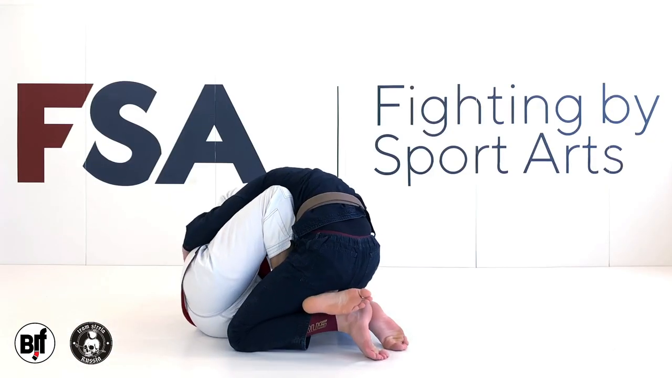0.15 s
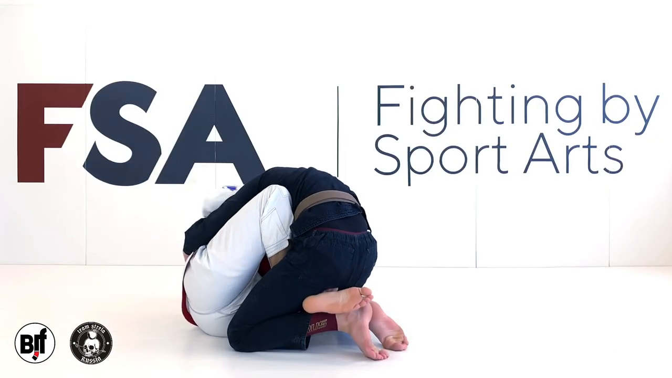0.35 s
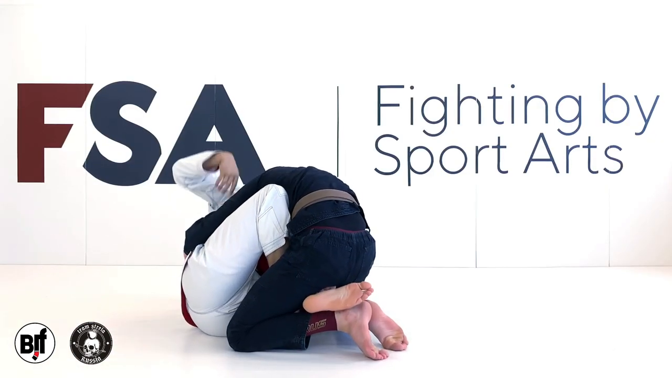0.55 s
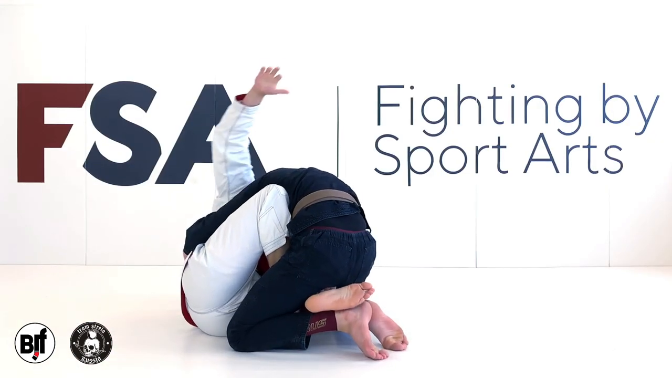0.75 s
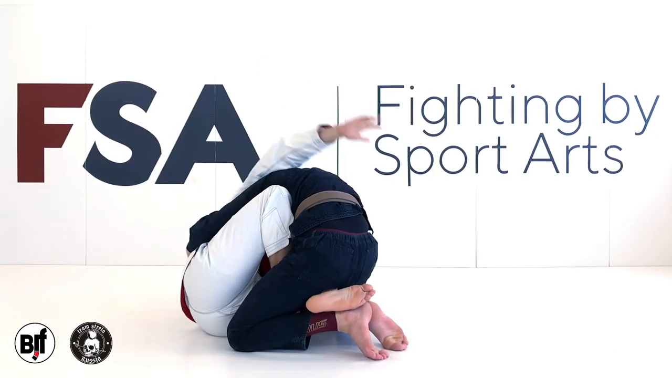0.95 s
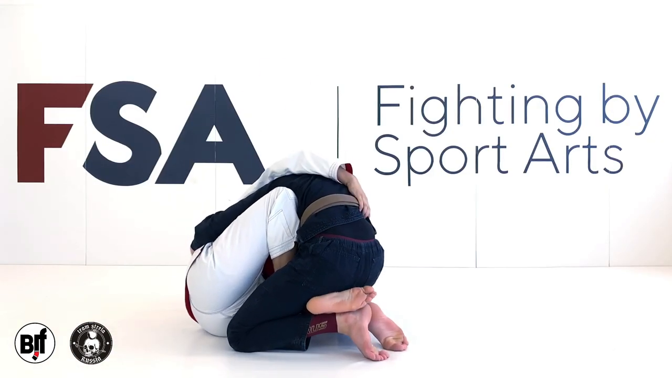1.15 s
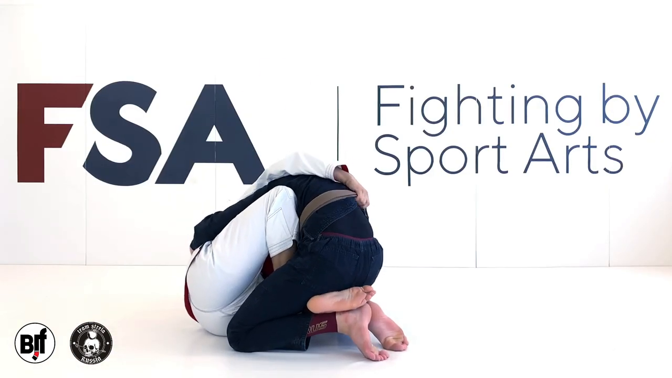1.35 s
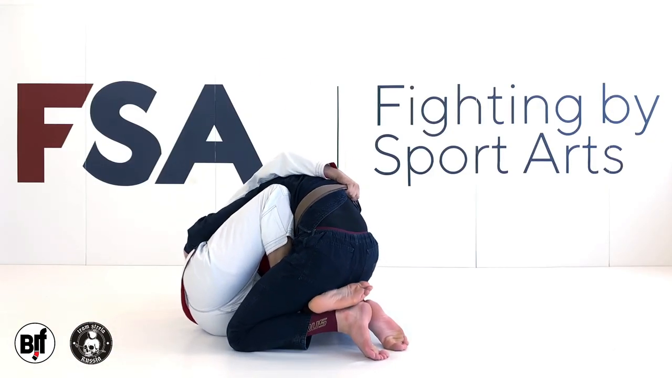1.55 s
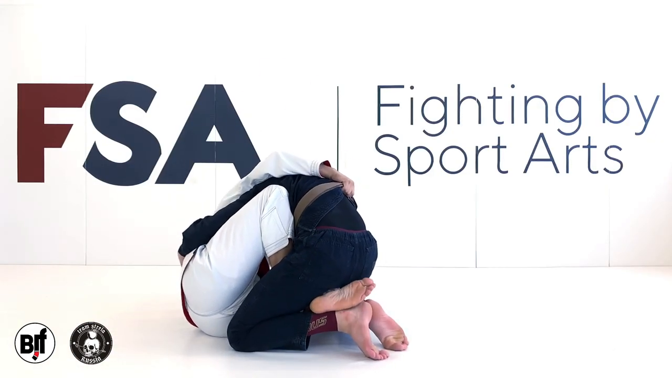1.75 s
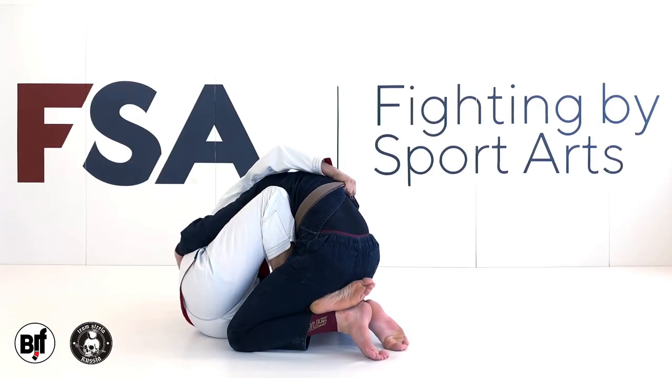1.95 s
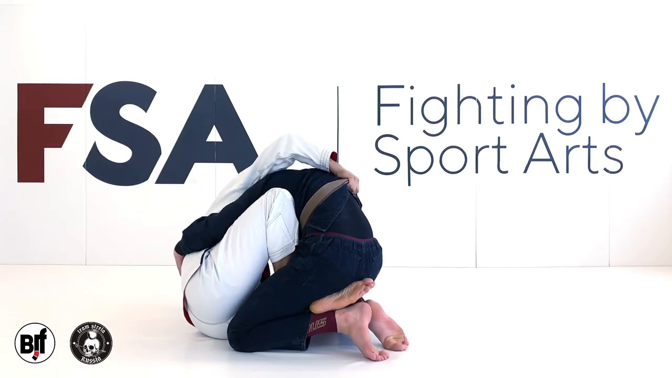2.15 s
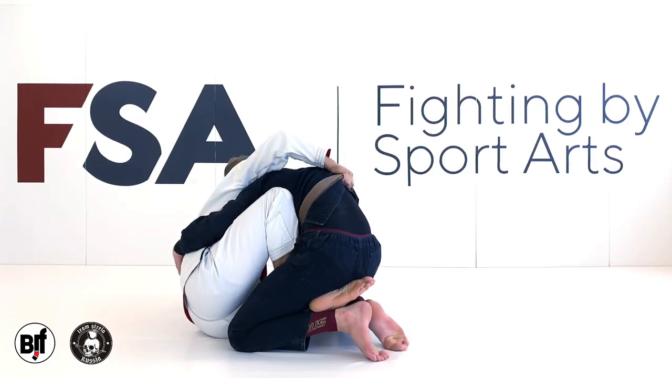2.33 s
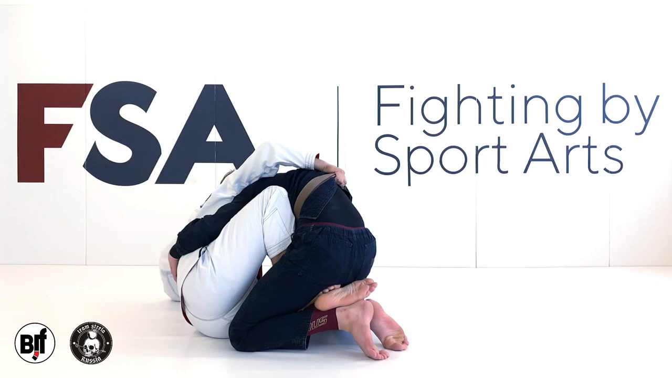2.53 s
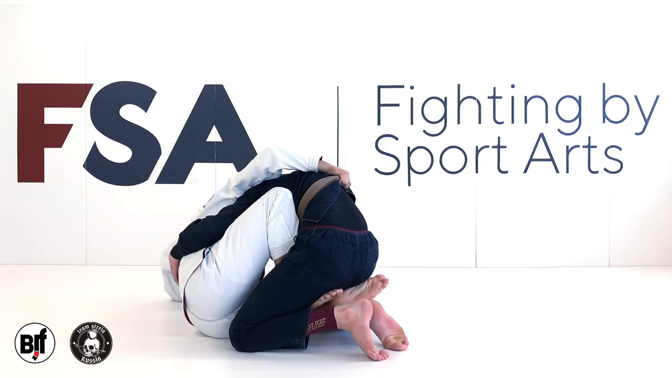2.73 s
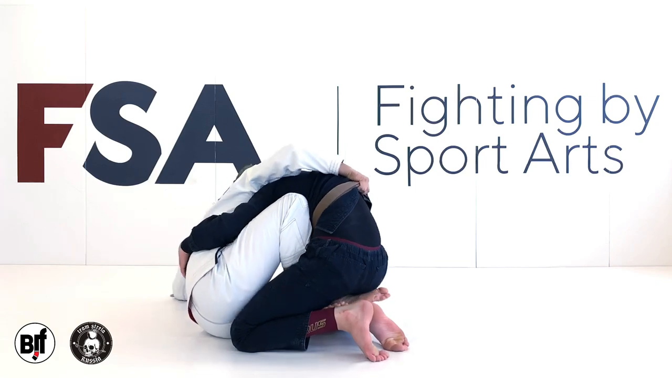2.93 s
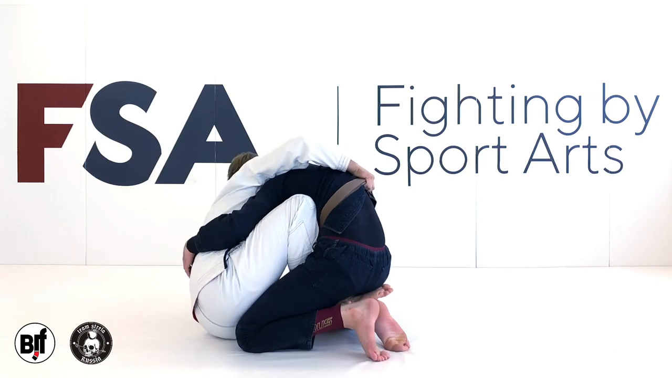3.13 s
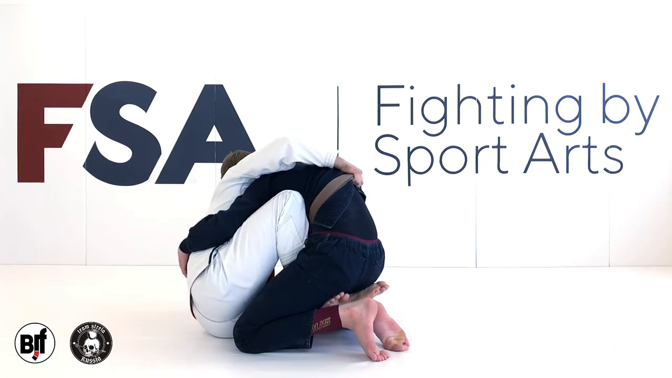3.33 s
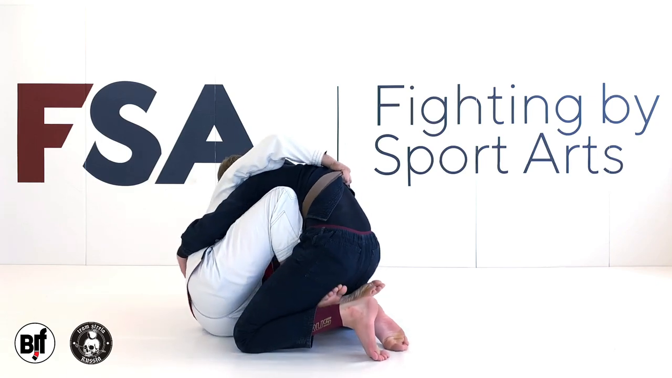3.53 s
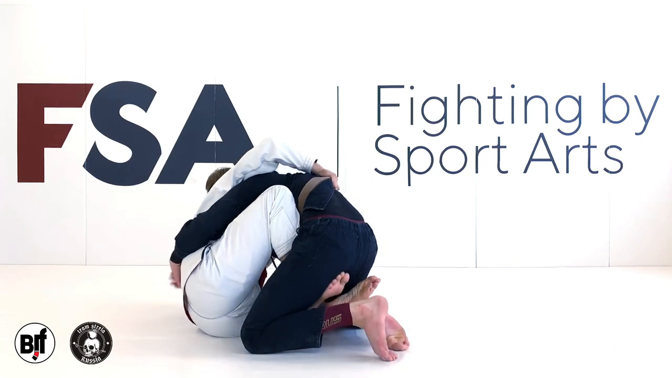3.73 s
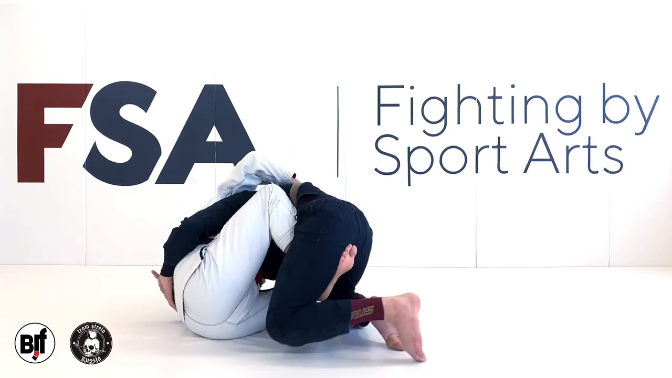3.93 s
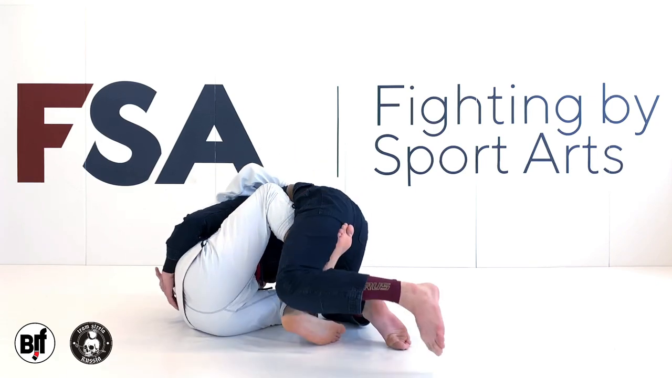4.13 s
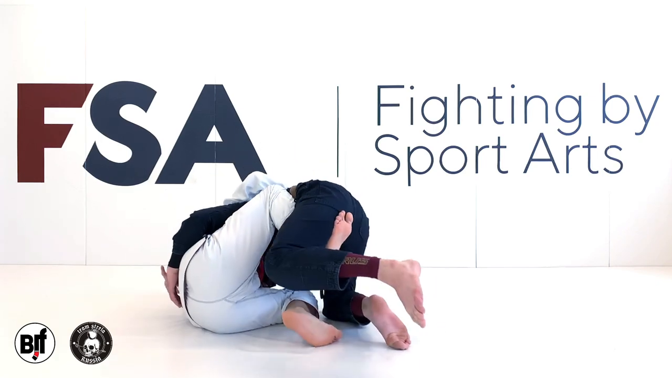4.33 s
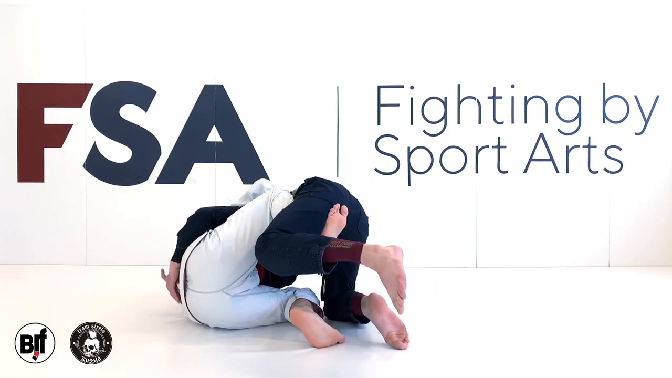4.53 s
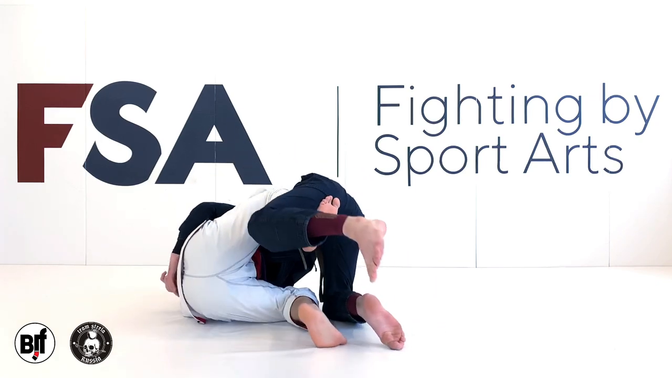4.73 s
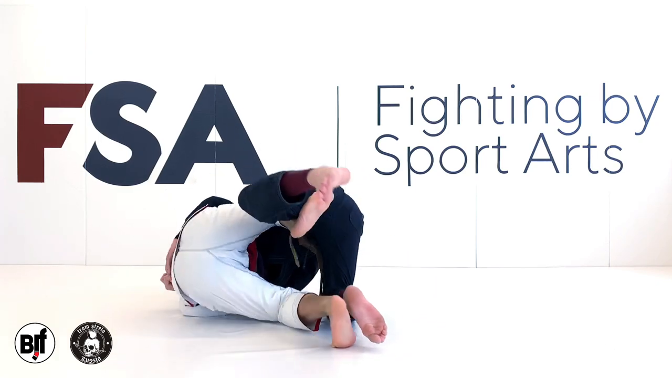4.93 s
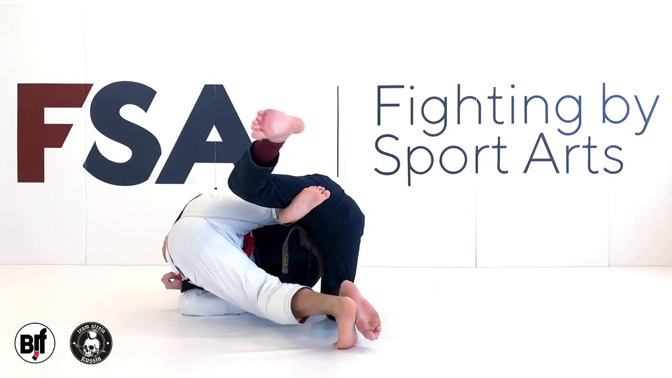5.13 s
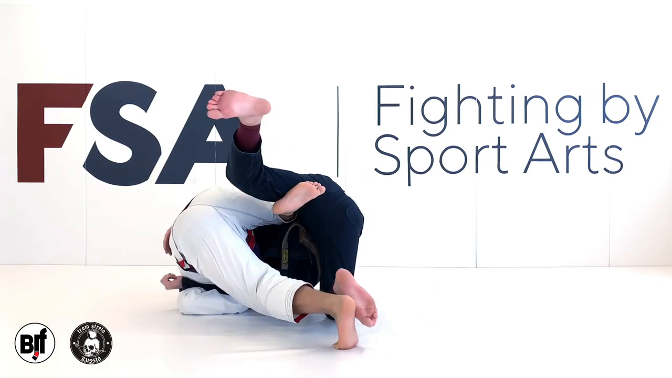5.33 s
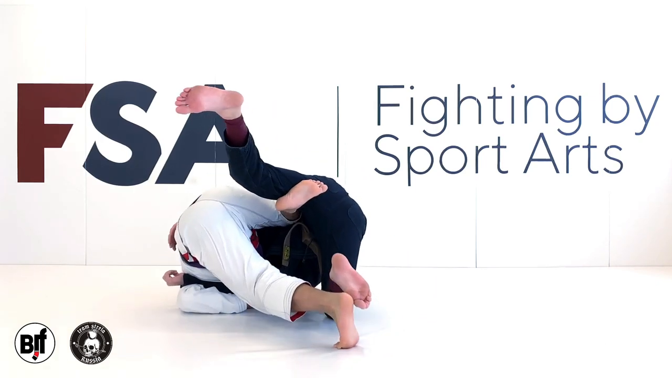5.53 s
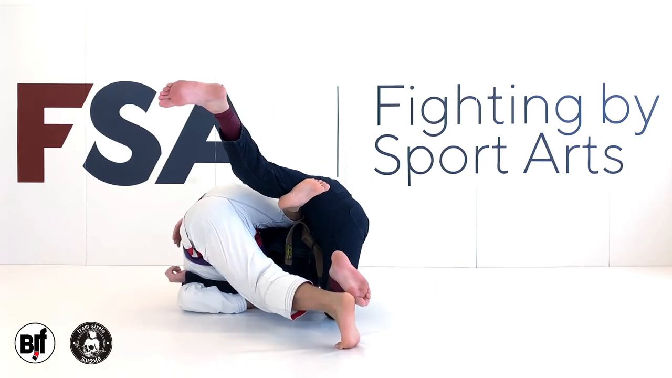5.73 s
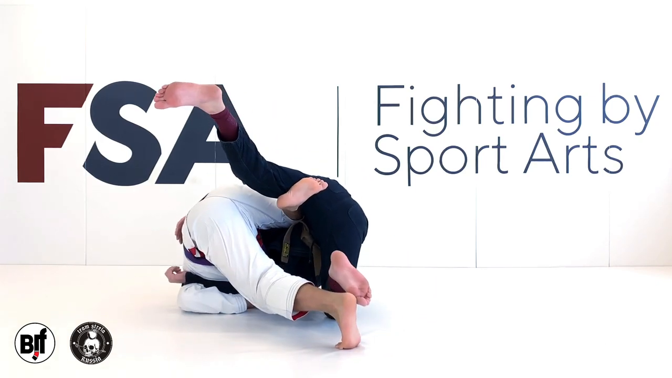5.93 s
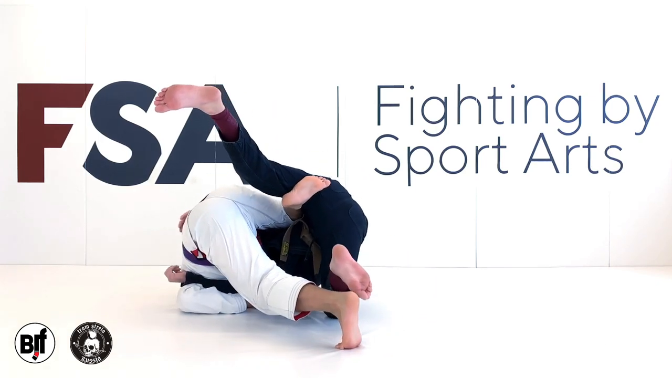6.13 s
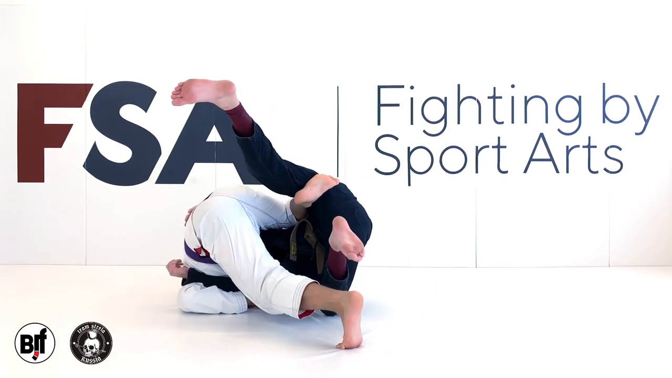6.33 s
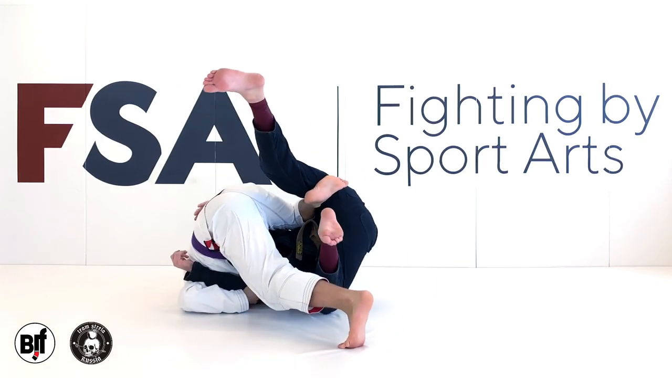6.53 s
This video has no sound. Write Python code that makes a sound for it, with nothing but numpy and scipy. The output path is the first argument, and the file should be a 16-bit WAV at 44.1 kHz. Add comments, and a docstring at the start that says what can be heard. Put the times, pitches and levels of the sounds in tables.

```python
"""Grappling on a foam mat

Two people in heavy cotton suits grapple in a bare hall: a hand slaps a back, knees and feet thump, cloth drags
and snaps taut. Cloth and foam are shaped noise, slaps are spikes and sprays, thumps are short swelling tones.
The floor jolts the microphone mount, which pushes its two capsules in opposite senses; the hall answers
for about a second over a low air hum."""
import sys
import numpy as np
from scipy import signal
from scipy.fft import rfft, irfft, next_fast_len
from scipy.io import wavfile
from scipy.ndimage import map_coordinates

SR = 44100
rng = np.random.default_rng(int(sys.argv[2]) if len(sys.argv) > 2 else 0)


def pcm_store(signal):
    """Save signal as 16-bit PCM."""
    levels = np.round(np.clip(np.atleast_2d(signal), -1, 1) * 32767)
    wavfile.write(sys.argv[1], SR, levels.astype(np.int16).T)


N = 290001  # length in samples


def amp(db):
    """Decibels to gain."""
    return 10 ** (np.asarray(db) / 20)


def unit(x):
    """Scaled to rms 1."""
    return x / np.sqrt(np.mean(x ** 2) + 1e-20)


def along(points, hz, axis=1):
    """Reads one column of a table whose rows start with Hz, on a log frequency axis."""
    table = np.transpose(points)
    return np.interp(np.log(hz + 1), np.log(table[0] + 1), table[axis])


def wobble(rate):
    """A smooth curve through random points, rate points a second."""
    points = rng.standard_normal(int(N * rate / SR) + 4)
    return map_coordinates(points, [np.arange(N) * rate / SR])


def filtered(x, response):
    """x times a response of frequency."""
    m = next_fast_len(x.shape[-1] + SR // 2)
    spectrum = rfft(x, m) * response(np.fft.rfftfreq(m, 1 / SR))
    return irfft(spectrum, m)[..., :x.shape[-1]]


def coloured(x, spectrum):
    """x shaped to a spectrum, rms 1."""
    return unit(filtered(x, lambda hz: amp(along(spectrum, hz))))


def resonance(hz, centre_hz, width_hz):
    """Response of one damped mode: strongest at its centre, broader with more damping."""
    return 1j * hz * width_hz / (centre_hz ** 2 - hz ** 2 + 1j * hz * width_hz)


def packets(table):
    """Soft contacts: a few cycles that swell and fade, at half their peak or more for the given length."""
    out, t = np.zeros(N + SR), np.arange(-SR // 8, SR // 8) / SR
    starts = rng.random((len(table), 1))  # where in its cycle each tone stands, in turns
    for (s, db, hz, length), start in zip(table, starts):
        swell = np.exp(-np.log(16) * (t / length) ** 2)
        tone = np.sin(2 * np.pi * (hz * t + start))
        out[round(s * SR) - SR // 8:][:len(t)] += amp(db) * swell * tone
    return out[:N]


# How alike left and right are in the hall. Each row: frequency in Hz, likeness (1 means identical).
LIKENESS = [(40, 0.75), (110, 0.93), (180, 0.31), (300, 0.69), (700, 0.29), (3000, 0.37), (8000, 0.2),
            (15000, 0.69)]


def widened(pair):
    """Two unrelated signals mixed to the hall's left-right likeness."""
    turn = lambda hz: np.arccos(np.clip(along(LIKENESS, hz), -1, 1)) / 2
    mid, side = filtered(pair, lambda hz: np.array([np.cos(turn(hz)), np.sin(turn(hz))]))
    return np.array([mid + side, mid - side])


# Tone of the hall's air and hum. Each row: frequency in Hz, relative level in dB per Hz.
AIR_TONE = [(15, -45), (25, -10.5), (80, 3.5), (165, -0.5), (486, -11), (572, -9.5), (1180, -14),
            (1780, -15.5), (4950, -21.5), (13400, -30.5), (15800, -34)]


def air():
    """The steady air of the hall: shaped wide noise, slightly uneven in level."""
    level_db = -60.5 + 0.64 * wobble(3.257)
    return amp(level_db) * widened(coloured(rng.standard_normal((2, N)), AIR_TONE))


# Movements of the two bodies. Each row: strongest moment in seconds, rise in seconds, fall in seconds,
# then four levels in dB, before each layer's own trim: limbs dragging on the mat, cotton rubbing,
# fast scuff, weight on the foam.
MOVEMENTS = [(0.0, .05, 0.19, -59, -53.5, -64, -58.5), (0.44, 0.22, 0.28, -57, -61, -71.5, -63),
             (1.01, 0.021, 0.055, -59, -80, -88, -69), (1.08, 0.045, .02, -57, -79, -88, -64),
             (1.58, .03, 0.12, -64, -59, -75, -62), (1.65, 0.066, 0.076, -57, -56, -62.5, -60),
             (2.03, 0.028, 0.22, -65, -65, -72, -77), (2.14, 0.062, 0.064, -58, -69, -70, -48),
             (2.182, 0.052, 0.063, -45.5, -56, -56.5, -50), (2.25, 0.033, .26, -57, -58, -61, -55),
             (2.665, 0.025, 0.14, -61, -52.5, -58, -57), (2.984, 0.35, 0.11, -57, -63.5, -78, -53.5),
             (3.086, 0.16, 0.19, -58.5, -58.5, -58.5, -55.5), (3.337, 0.065, 0.082, -54.5, -60.5, -69, -59),
             (3.47, 0.28, 0.098, -58, -61.5, -68, -55), (3.545, 0.059, .07, -68, -54.5, -48.5, -62),
             (3.706, 0.18, 0.06, -50.5, -65, -62.5, -49.5), (3.771, 0.018, .07, -51, -57, -62, -52),
             (3.968, 0.27, 0.22, -51.5, -54, -61.5, -55), (4.08, .15, 0.17, -60, -59.5, -65, -63),
             (4.43, .03, 0.24, -65.5, -71, -82, -61.5), (4.592, 0.26, 0.11, -65, -63, -75.5, -72),
             (4.81, 0.083, .1, -62, -67, -75, -56.5), (4.894, 0.11, 0.16, -52, -56.5, -62.5, -54),
             (4.97, 0.13, 0.24, -57, -50.5, -65.5, -58), (5.08, 0.24, 0.087, -61, -50.5, -65, -56.5),
             (5.38, 0.052, .03, -59, -72, -73, -70), (5.6, .25, 0.18, -72, -72, -78, -57),
             (5.758, 0.21, 0.26, -59.5, -64, -69, -69), (6.108, 0.082, 0.5, -63, -75, -75.5, -60.5),
             (6.36, .03, .08, -69, -72, -71, -77), (6.435, .02, 0.025, -75, -67, -65, -54.5),
             (6.57, .2, .05, -75, -85, -87, -64.5)]
EDGE_DB = 20  # a movement swells and fades by this much over its rise and its fall


def stroke(axis):
    """Gain of one layer (a column of the table): every movement swells to its peak and fades again."""
    t = np.arange(N) / SR
    power = np.zeros(N)
    for row in MOVEMENTS:
        peak_s, rise_s, fall_s = row[:3]
        distance = np.maximum((peak_s - t) / rise_s, (t - peak_s) / fall_s)
        power += amp(row[axis] - EDGE_DB * distance) ** 2
    return np.sqrt(power)


def fibres(rate, spread_db):
    """Weave catching on weave: dense noise with sparse stronger ticks, about rate a second."""
    ticks = (rng.random(N) < rate / SR) * amp(spread_db * rng.random(N))
    return rng.standard_normal(N) * (1 + ticks)


# Tones of a dragged limb, rubbing cotton and a fast scuff.
# Each row: frequency in Hz, relative level in dB per Hz.
DRAG_TONE = [(150, -27), (400, -4), (900, -1.5), (1600, -6.5), (3500, -17), (12000, -41)]
RUB_TONE = [(600, -26), (1500, 0.5), (2500, 1), (4500, -2), (7000, -12), (15000, -22)]
SCUFF_TONE = [(1500, -50), (3000, -7.5), (5000, -2), (9000, -6.5), (15500, -11.5)]


def cloth():
    """A dragged limb is dull, rubbing cotton brighter, a fast scuff brightest; all stutter as folds slip."""
    slip = wobble(35)  # shared by all three
    drag = amp(0.38 * slip + 0.75 * wobble(70)) * coloured(fibres(rate=200, spread_db=9), DRAG_TONE)
    rub = amp(1.2 * slip + 1.1 * wobble(90)) * coloured(fibres(rate=280, spread_db=18), RUB_TONE)
    scuff = amp(1.0 * slip + 1.4 * wobble(120)) * coloured(fibres(rate=170, spread_db=14), SCUFF_TONE)
    dragging = amp(-5) * stroke(axis=3) * unit(drag)
    rubbing = amp(-3.5) * stroke(axis=4) * unit(rub)
    scuffing = amp(0.5) * stroke(axis=5) * unit(scuff)
    return dragging + rubbing + scuffing


# Tone of the kneaded foam. Each row: frequency in Hz, relative level in dB per Hz.
FOAM_TONE = [(30, -9), (70, -3.5), (150, -1.5), (350, -1.5), (700, -17.5), (1500, -48)]


def foam():
    """Shifting weight kneads the mat in low lumps of noise."""
    lumps = amp(4.7 * wobble(30)) * coloured(rng.standard_normal(N), FOAM_TONE)
    return amp(-1.5) * stroke(axis=6) * unit(lumps)


# Early echoes from the walls. Each row: delay in seconds, level in dB.
ECHOES = [(0.0099, -10.5), (.0128, -11), (0.0192, -14.5), (0.0212, -11), (0.025, -20.5), (.033, -17)]


def walls(x):
    """A few early echoes, each reaching one side a little sooner than the other."""
    taps = np.zeros((2, SR // 20))
    leans = rng.uniform(-1, 1, (len(ECHOES), 1))
    for (s, db), lean in zip(ECHOES, leans):
        arrivals_s = s + .00015 * lean * np.array([1, -1])
        taps[[0, 1], np.round(arrivals_s * SR).astype(int)] += amp(db)
    return signal.fftconvolve(x[None], taps, axes=1)[:, :N]


# How the hall rings. Each row: frequency in Hz, seconds to die away by 60 dB, relative starting level in dB.
RINGING = [(58.4, 0.62, 5), (250, 0.51, -5.5), (700, 0.81, 2), (2000, 1.137, 0), (4000, 1.09, 1),
           (7900, 0.87, 2), (15300, 0.64, -4)]


def hall(x):
    """The diffuse tail: noise in which each frequency dies at its own speed."""
    hz, t, z = signal.stft(rng.standard_normal((2, SR + SR // 2)), SR, nperseg=256)
    fade_db = along(RINGING, hz, axis=2)[:, None] - 60 * t / along(RINGING, hz)[:, None]
    tail = widened(signal.istft(z * amp(fade_db), SR, nperseg=256)[1])
    tail *= 1 - np.exp(-np.arange(tail.shape[1]) / SR / 0.0035)  # the field builds up
    tail *= amp(-0.48) / np.linalg.norm(tail[0])
    return signal.fftconvolve(x[None], tail, axes=1)[:, :N]


def mount():
    """The mount rocks near 170 Hz: single jolts over a tremble that follows the weight on the mat."""
    sway = filtered(rng.standard_normal(N), lambda hz: resonance(hz, centre_hz=168, width_hz=107) ** 2)
    tremble_gain = amp(-73.5) + amp(-1.5) * stroke(axis=6)
    shake = jolts() + tremble_gain * unit(amp(3.5 * wobble(21)) * sway)
    lag = lambda hz: np.exp(-2j * np.pi * hz * 0.00022)  # the left capsule follows a little late
    return np.array([filtered(shake, lag), -shake])  # opposite senses


# Slaps and snaps of hands and folds; the rows at 1.1255 and 1.135 are wall echoes of the slap.
# Each row: start in seconds, peak in dB, centre in Hz, width in Hz, time in seconds for the spray
# to die away by 60 dB.
SLAPS_AND_SNAPS = [(1.0915, -42, 2000, 3000, .03), (1.0946, -23.5, 2240, 1490, 0.015),
                   (1.0990, -26.5, 1500, 3000, 0.049), (1.1060, -18.5, 1510, 1800, 0.031),
                   (1.1100, -16.5, 1170, 700, 0.022), (1.1125, -23, 2960, 5000, 0.013),
                   (1.1148, -6, 3880, 4900, 0.0034), (1.116, -10, 1250, 2980, .003),
                   (1.1255, -25, 4500, 5000, 0.011), (1.135, -27, 5600, 4000, 0.014),
                   (1.6484, -43, 2580, 800, 0.014), (2.1123, -40, 602.6, 1164, 0.052),
                   (2.1740, -40.5, 1192, 4000, 0.044), (2.5160, -40, 1000, 1510, .038),
                   (2.5257, -28.5, 700, 1200, 0.021), (2.5300, -25, 446.5, 906, 0.029),
                   (2.5360, -25.5, 545, 1200, 0.018), (2.5380, -36, 8900, 9000, 0.14),
                   (2.5410, -21.5, 1000, 2570, 0.018), (2.5490, -26, 600, 1200, .017),
                   (2.5620, -29.5, 496, 700, 0.013), (3.0380, -43.5, 560, 600, .06),
                   (3.3375, -40, 3020, 6050, .008), (3.5412, -39, 6000, 6000, .006),
                   (3.6440, -33.5, 2000, 6000, 0.016), (3.6900, -39.5, 500, 990, 0.09),
                   (3.7667, -34.5, 700, 3470, 0.021), (3.9444, -44, 4270, 2500, 0.056),
                   (4.1180, -42.5, 600, 1196, 0.036), (4.8630, -43.5, 886, 1200, 0.024),
                   (5.2180, -40.5, 2540, 2000, .01), (5.3946, -33, 3000, 1500, 0.015),
                   (5.4016, -33.5, 3170, 1200, .003), (5.4084, -24.5, 3240, 7050, .005),
                   (5.4160, -31, 6000, 6000, .006)]
SPIKY_S = 0.019  # the shorter a snap is against this, the more of it is one spike
CONTACT_S = .00004  # fading time of a spike, in seconds


def snaps(count):
    """Air squeezed from under a palm or a taut fold: a spike and a short spray in one broad resonance.
    Returns the direct sound, and the smooth average over all directions, dealt in turn over count groups,
    each to be given its own random hall tail, so the tails stay smooth."""
    direct, spread, t = np.zeros(N + SR), np.zeros((count, N + SR)), np.arange(SR // 10) / SR
    sprays = rng.standard_normal((len(SLAPS_AND_SNAPS), len(t)))
    for k, (row, spray) in enumerate(zip(SLAPS_AND_SNAPS, sprays)):
        s, db, centre_hz, width_hz, t60 = row
        spike_share = np.exp(-t60 / SPIKY_S)
        pocket = lambda hz: resonance(hz, centre_hz, width_hz) / (1 + 1j * hz / (centre_hz + width_hz))
        spike = 4 * np.exp(-t / CONTACT_S)
        puff = amp(-60 * t / t60) * (1 - np.exp(-t / 0.001)) * spray
        burst = filtered(spike_share * spike + (1 - spike_share) * puff, pocket)
        burst *= amp(db) / np.abs(burst).max()
        smooth = filtered(1. * (t == 0), pocket)  # one click through the same resonance
        smooth *= np.linalg.norm(burst) / np.linalg.norm(smooth)  # as much energy as the burst
        direct[round(s * SR):][:len(t)] += burst
        spread[k % count, round(s * SR):][:len(t)] += smooth
    return direct[:N], spread[:, :N]


# Low thumps: the slapped back's low tones near 1.11 s, then limbs on the foam.
# Each row: middle in seconds, peak in dB, pitch in Hz.
LOW_THUMPS = [(1.112, -33, 193), (1.114, -30, 125), (1.116, -30, 325), (1.122, -39.5, 69),
              (2.124, -45.5, 346), (2.172, -38, 188), (2.185, -34.5, 365), (2.215, -42.5, 196),
              (2.246, -42, 182), (2.275, -40.5, 137), (2.534, -29, 197), (2.56, -44.5, 85.5),
              (2.548, -34, 430), (2.590, -43.5, 226), (2.868, -35, 155.5), (2.885, -39, 172),
              (2.905, -44, 143.8), (2.952, -54, 206), (3.012, -41.5, 175), (3.040, -44, 334),
              (3.050, -48, 70), (3.446, -39.5, 158), (3.545, -50, 161.2), (3.648, -48, 256),
              (3.694, -53, 247), (3.773, -39.5, 315), (3.983, -43.5, 391.5), (4.006, -45, 330),
              (4.133, -45, 210), (4.190, -52.5, 56.6), (4.800, -49.5, 250), (5.029, -50, 296),
              (5.09, -48, 149.4), (5.204, -47.5, 70), (5.510, -52, 244), (5.806, -49.5, 561),
              (6.438, -50, 145.4), (6.470, -50.5, 137.3)]
THUMP_CYCLES = 2.12  # a thump lasts this many cycles of its pitch


def thumps():
    """A slapped back and limbs sinking into foam give soft low tones: the lower, the longer."""
    return packets([(s, db, hz, THUMP_CYCLES / hz) for s, db, hz in LOW_THUMPS])


# Jolts of the microphone mount. Each row: middle in seconds, peak in dB, length in seconds.
MOUNT_JOLTS = [(1.137, -42, .017), (2.167, -45, .02), (2.567, -42, .012), (2.884, -46, .012),
               (3.026, -39, .017), (3.451, -46, .017), (3.714, -49, .018), (3.787, -33, .018),
               (3.868, -42, .016), (3.967, -42, .015), (4.132, -32.5, 0.027), (4.172, -39, 0.013),
               (4.484, -43, 0.018), (4.800, -38, .016), (4.877, -26.5, 0.014), (4.897, -16.5, 0.015),
               (5.046, -27.5, .027), (5.074, -28.5, 0.028), (5.107, -29.5, 0.019), (5.165, -31, 0.019),
               (5.517, -34.5, 0.014), (6.504, -42.5, 0.052)]
MOUNT_HZ, MOUNT_SCATTER = 163.2, 0.045  # pitch of a jolt, and its typical share of change each time
REBOUND_S, REBOUND_DB = 0.0211, -10.5  # time between rebounds, change of level each time


def jolts():
    """Each jolt rocks the mount at about its own pitch and rebounds three times, ever weaker."""
    rows = [(s + k * REBOUND_S, db + k * REBOUND_DB, length)
            for s, db, length in MOUNT_JOLTS for k in range(4)]
    drift = 1 + MOUNT_SCATTER * rng.standard_normal(len(rows))
    return packets([(s, db, MOUNT_HZ * d, length) for (s, db, length), d in zip(rows, drift)])


FOAM_DAMPING_DB = -2.5  # the foam keeps part of the low sounds out of the hall


def scene():
    """Bodies in front of the microphone; each group of snaps, the low sounds and the cloth get a hall tail."""
    cracks, groups = snaps(count=7)
    low = thumps() + foam()
    fabric = cloth()
    bodies = cracks + low + fabric
    tails = sum(hall(part) for part in [*groups, amp(FOAM_DAMPING_DB) * low, fabric])
    return bodies + walls(bodies) + tails + mount() + air()


TOP_HZ = 15850  # band limit


def record(dry):
    """The microphone rolls off deep bass and high treble; nothing is kept above the band limit."""
    bass_cut = lambda hz: (1j * hz / (30 + 1j * hz)) ** 2
    capsule = lambda hz: resonance(hz, centre_hz=700, width_hz=20000)
    return filtered(dry, lambda hz: bass_cut(hz) * capsule(hz) * (hz < TOP_HZ))


dry = scene()
out = record(dry)
pcm_store(out)
```